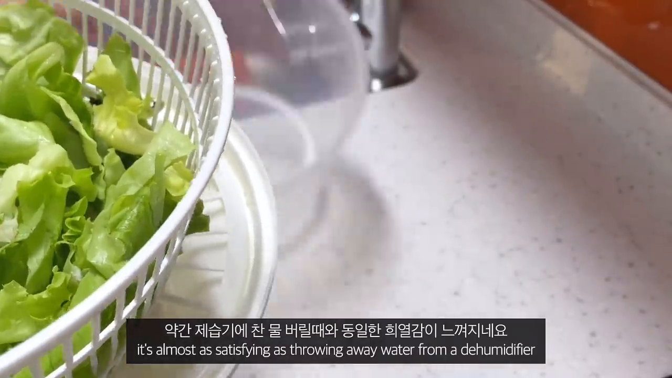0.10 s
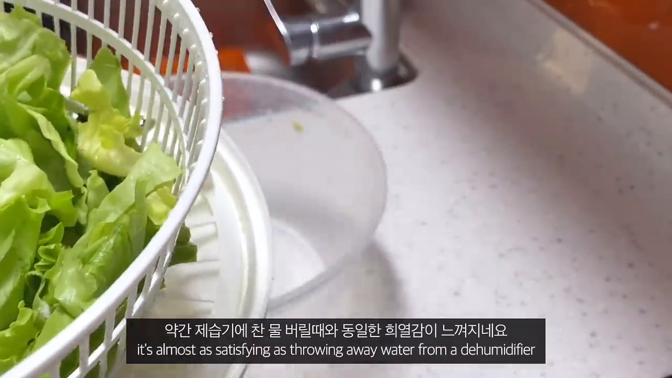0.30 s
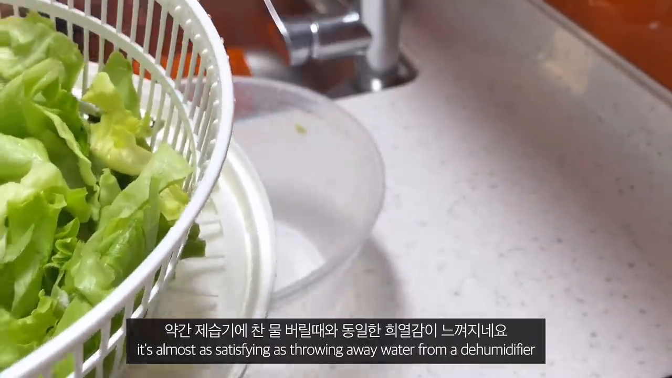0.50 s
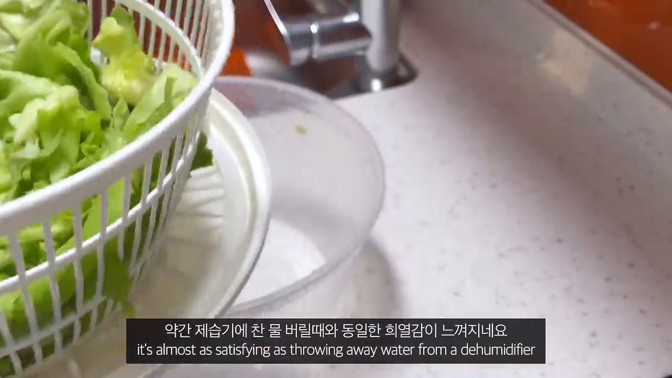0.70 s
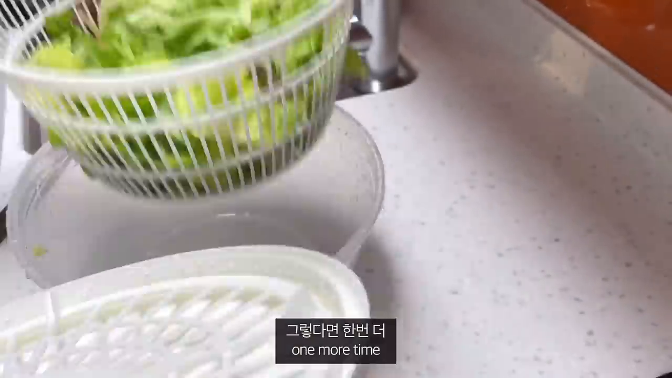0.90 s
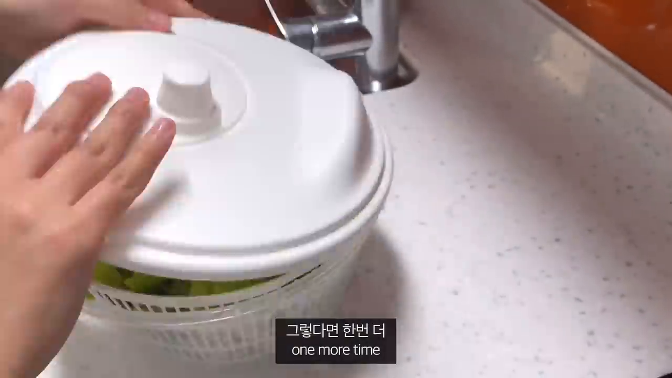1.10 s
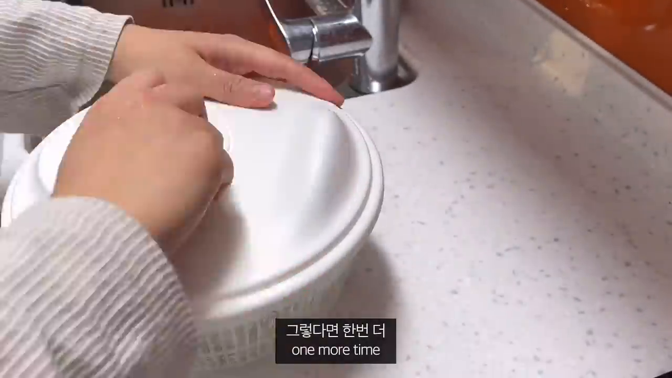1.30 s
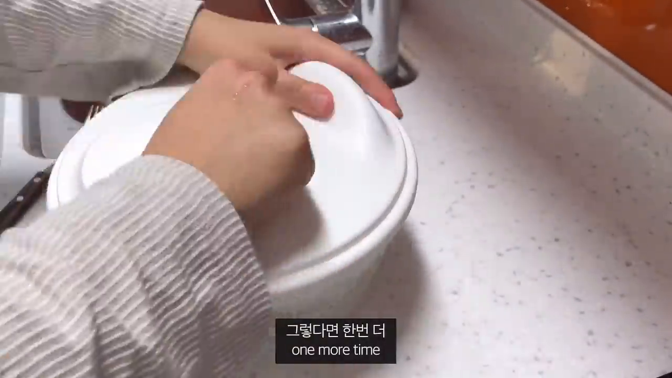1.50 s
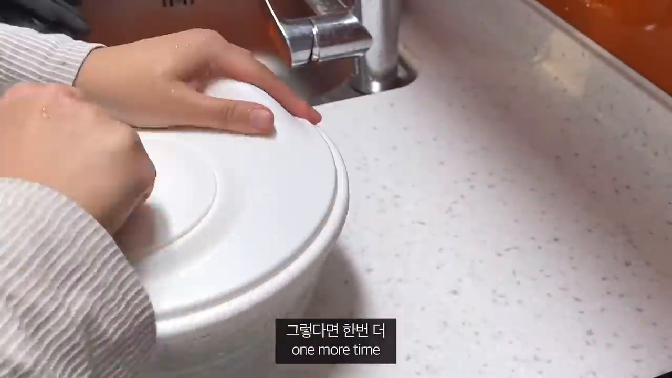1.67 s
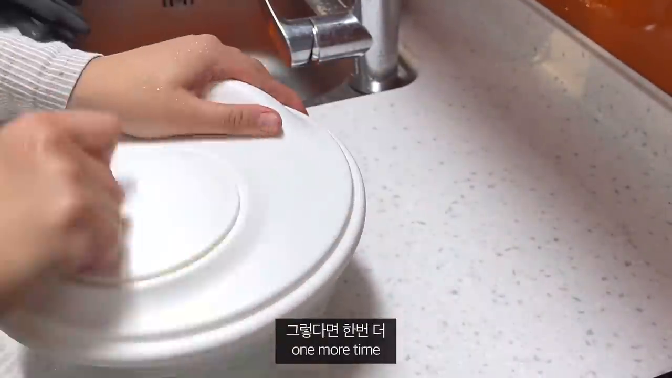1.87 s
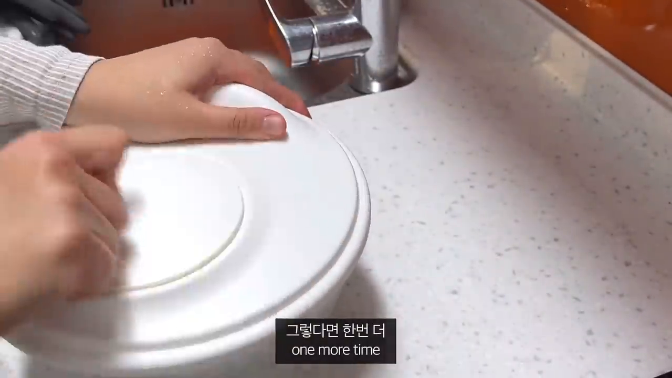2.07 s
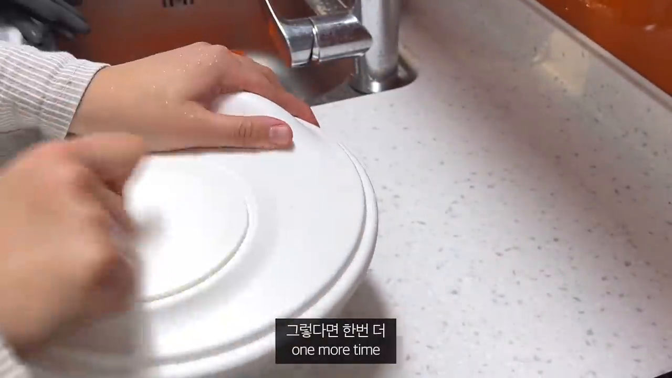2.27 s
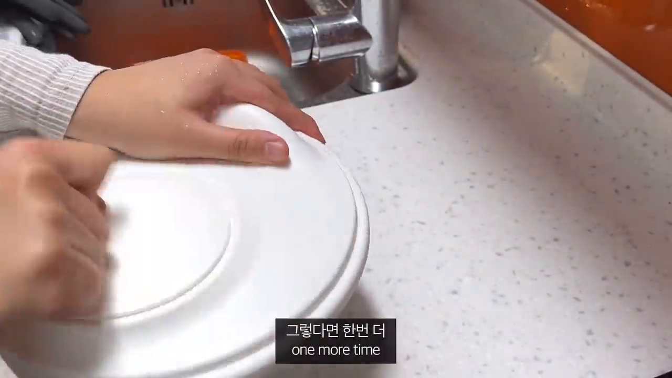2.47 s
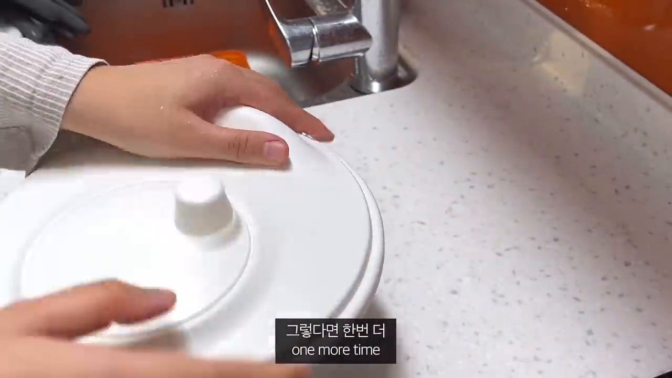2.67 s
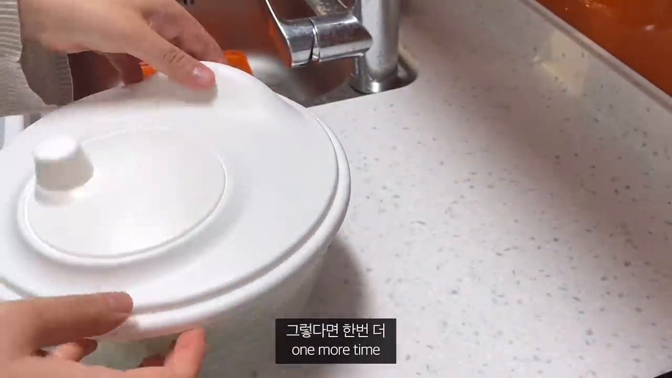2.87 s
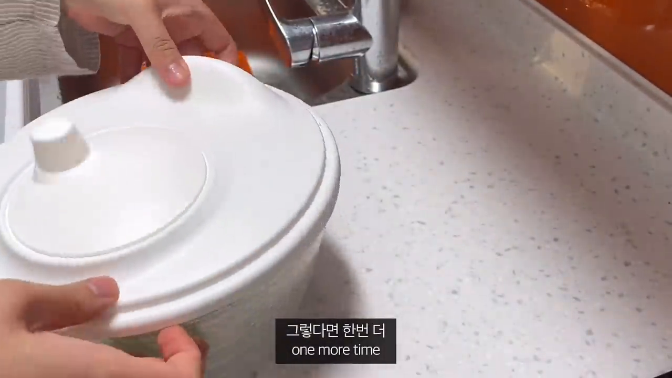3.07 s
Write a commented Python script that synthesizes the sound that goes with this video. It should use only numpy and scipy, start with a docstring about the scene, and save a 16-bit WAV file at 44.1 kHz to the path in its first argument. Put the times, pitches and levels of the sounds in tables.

```python
"""A steel sink, then a humming kitchen: a plastic tub knocks on the sink, which rumbles and drips.
After an abrupt change, a basket of lettuce clatters into a salad spinner and the lid is pressed on.
The crank is turned: the basket rubs and chatters once a revolution, then coasts with a light rattle.
Knocks are fading sine tones plus bursts of noise; rubbing, whir and rumble are shaped noise;
a train of uneven pulses drives the chatter, and a few steady tones make the fan's hum."""
import sys
import numpy as np
from scipy import signal
from scipy.fft import rfft, irfft, next_fast_len
from scipy.io import wavfile
from scipy.ndimage import uniform_filter1d, map_coordinates

SR = 44100
rng = np.random.default_rng(int(sys.argv[2]) if len(sys.argv) > 2 else 0)


def unload_audio(sound):
    """Save the sound as a 16-bit wav file, at the path given as the first command line argument."""
    columns = np.transpose(np.atleast_2d(sound))
    # keep every value between -1 and 1, then stretch to whole-number steps
    steps = np.round(np.clip(columns, -1, 1) * 32767)
    wavfile.write(sys.argv[1], SR, steps.astype(np.int16))


N = 138915  # length in samples

# T60 is the time in seconds in which a sound fades by 60 dB.
CHANGE_S = .787  # the sink gives way to the humming kitchen

# One rub of the basket per revolution. Each row: start in seconds, length in seconds, level in dB.
BASKET_RUBS = [(1.717, 0.054, -30), (1.812, 0.04, -25.5), (1.889, 0.029, -24.5), (1.962, 0.028, -24.5),
               (2.021, 0.042, -23.5), (2.093, 0.025, -24.5), (2.16, 0.027, -24.5), (2.227, 0.032, -23.5),
               (2.285, 0.044, -25), (2.361, 0.019, -22), (2.428, 0.029, -23.5), (2.491, 0.036, -24),
               (2.575, 0.031, -27.5)]
# Tone colour of the rubbing. Each row: frequency in Hz, relative level in dB.
RUB_COLOUR = [(200, -5), (500, 0), (1050, -4.5), (3300, 3), (4500, -2.5), (6000, -1), (15500, -20.5)]
# Chatter grows with speed. Each row: time in seconds, rate in Hz, level over the scraping in dB.
CHATTER_GROWTH = [(1.702, 621.5, -4.5), (2.03, 683.1, 3)]
# Bowl driven by the chatter. Each row: frequency in Hz, width in Hz, relative level in dB.
BOWL_RESONANCES = [(683, 68, -1), (1433, 73, -7), (2050, 98, -5.5), (3220, 110, -5.5), (3685, 59, -3.5),
                   (4310, 26, -6.5), (5350, 630, -15)]
RUB_ATTACK_S, RUB_T60 = 0.0056, 0.065
CHATTER_SAG_PER_S = 1.1  # share of the chatter rate lost per second
RUB_DETUNE = 0.033  # the bowl flexes: its resonances shift by about this share from rub to rub
# A resonance that falls through each rub.
SQUEAK_FROM_HZ, SQUEAK_TO_HZ, SQUEAK_DB = 3700, 2990, -11.5

# Steady whir of the basket in the bowl. Each row: time in seconds, level in dB.
WHIR_LEVEL = [(1.45, -54.5), (1.75, -31), (2.65, -29), (3.15, -40)]
# Tone colour of the whir. Each row: frequency in Hz, relative level in dB.
WHIR_COLOUR = [(200, -7), (690, 8.5), (1000, -2.5), (1600, -1.5), (2400, -6), (15500, -24)]
FLUTTER_PER_S, FLUTTER_DB = 36, 2.1  # knots of the random curve per second, its typical swing

# Plastic parts touching. Each row: start in seconds, crack level in dB, thud level in dB.
PLASTIC_CLICKS = [(0.665, -38.5, -41.5), (.950, -21, -58), (0.9838, -14.5, -28), (1.052, -24, -36),
                  (1.0763, -7.5, -31), (1.0927, -17, -27), (1.1205, -13, -19), (1.129, -21, -26),
                  (1.1672, -21.5, -23), (1.192, -12.5, -23), (1.1961, -10.5, -15), (1.2633, -18, -18),
                  (1.307, -29.5, -30.5), (1.3508, -12.5, -16.5), (1.529, -27.5, -27), (1.5985, -26.5, -29),
                  (1.636, -55, -26), (2.095, -22, -16), (2.577, -19.5, -15), (2.859, -22, -24.5)]
# Tone colour of a crack. Each row: frequency in Hz, relative level in dB.
CRACK_COLOUR = [(200, -34), (1700, 9.5), (2400, 2), (3200, 9.5), (4500, 1.5), (7500, -3), (16000, -13.5)]
CRACK_T60, CRACK_TAIL_DB, CRACK_TAIL_T60 = 0.017, -18, 0.084
# Tones of bowl and lid. Each row: frequency in Hz, relative level in dB, T60 in seconds.
BOWL_MODES = [(244, -5.5, 0.079), (412, -5, 0.07), (519.3, 4, 0.047), (660, 4.5, 0.022),
              (1068, -5.5, 0.031), (1547, -3, 0.043)]
SEAT_S, SEAT_DB = 1.3505, 1.5  # the lid seats
# Tones of the lid's dome. Each row: frequency in Hz, relative level in dB, T60 in seconds.
LID_MODES = [(228, -20, .09), (314, -15.5, .14), (672, -2.5, .036), (1080, -10, .016), (1600, -6, .012),
             (2020, -5, .013)]
RISE_CYCLES = 1  # time constant, in cycles, of a plastic tone's build-up
# The lid sliding on the rim. Each row: time in seconds, level in dB.
SCRAPE_LEVEL = [(1.07, -78), (1.082, -28), (1.132, -21), (1.15, -47), (1.21, -21.5), (1.25, -106)]
# Tone colour of the sliding. Each row: frequency in Hz, relative level in dB.
SCRAPE_COLOUR = [(200, -8.5), (500, 0), (1700, -6), (15000, -19)]
# The lid's resonance as it slides home. Each row: time in seconds, frequency in Hz.
SLIDE_PITCH = [(1.078, 1955), (1.134, 1462), (1.199, 1023)]

# Loose plastic parts ticking. Each row: time in seconds, level in dB.
RATTLE_LEVEL = [(.8, -57.5), (2.0, -41), (3.15, -54.5)]
RATTLE_PER_S, RATTLE_SCATTER_DB = 130, 4.5

# Rumble of the sink. Each row: time in seconds, level in dB.
SINK_LEVEL = [(0, -48), (.23, -42.5), (.28, -36.5), (.5, -41.5)]
# Tone colour of the rumble. Each row: frequency in Hz, relative level in dB.
SINK_RUMBLE = [(30, -24), (52, -6), (122, -6), (153, 6), (190, -14.5), (1000, -30.5), (3000, -41),
               (14000, -54)]
# Blows on the sink. Each row: start in seconds, ring level in dB, level of the noise splash in dB.
SINK_BLOWS = [(0.2426, -11, -11), (.263, -18, -22.5), (.358, -33, -30)]
# Tones of sink and tub. Each row: frequency in Hz, relative level in dB, T60 in seconds.
SINK_MODES = [(157.7, -0.5, 0.38), (701, 11, 0.037), (1298, 1.5, 0.035), (2340, -12.5, 0.056)]
# Tone colour of the splash of noise. Each row: frequency in Hz, relative level in dB.
SINK_NOISE = [(80, 9.5), (400, 5), (1300, -3), (2300, -10), (3200, -22.5), (6500, -31.5), (9000, -44.5)]
# Drips. Each row: start in seconds, frequency in Hz, starting level in dB.
DRIPS = [(.449, 3010, -53)]

# A fan's tones. Each row: frequency in Hz, average level in dB.
FAN_TONES = [(528, -47.5), (660, -45.5), (699, -53.5)]
FAN_AIR_DB = -48
# Tone colour of the fan's air. Each row: frequency in Hz, relative level in dB.
FAN_AIR = [(200, -1.5), (700, 0.5), (950, -19), (15000, -33)]

# Left-right balance of the spinner. Each row: frequency in Hz, left minus right in dB.
BALANCE = [(850, -1.5), (1800, 9.5), (3500, -1), (14000, 4)]
# Scattered reflections, before a further cut. Each row: frequency in Hz, relative side level in dB.
SPREAD = [(150, -24), (310, -19), (600, -13), (1700, -2.5), (8000, 0.5)]
ROOM_DB, ROOM_T60 = -17.5, 0.16
LOW_CUT_HZ, TOP_HZ = 205, 16100


def rubs():
    """Once a revolution the basket scrapes the bowl; its chatter, at a sagging rate, rings the bowl."""
    out, t = np.zeros(N), np.arange(SR // 6) / SR
    scraping = patchy(grit(RUB_COLOUR, grain_db=4, rate=900), depth_db=4.5)
    when, rates, strengths = np.transpose(CHATTER_GROWTH)
    for s, length, db in BASKET_RUBS:
        hz = np.interp(s, when, rates)
        chatter_db = np.interp(s, when, strengths)
        fade_db = -60 * np.maximum(t - length, 0) / RUB_T60
        press = np.clip(t / RUB_ATTACK_S, 0, 1) * amp(db + fade_db)

        # uneven pulses, one per chatter cycle
        sag = CHATTER_SAG_PER_S * (np.minimum(t, length) - length / 2)
        cycles = np.cumsum(hz * (1 - sag)) / SR
        size = rng.standard_normal(160)
        number = np.arange(len(size))
        times = np.interp(number, cycles, t)
        strength = amp(2 * size) * (number < cycles[-1])
        pulses = np.histogram(times, len(t), (0, t[-1]), weights=strength)[0]
        friction = unit(pulses) + amp(1.5) * rng.standard_normal(len(t))

        shift = 1 + RUB_DETUNE * rng.uniform(-1.1, 1)
        resonances = np.multiply(BOWL_RESONANCES, [shift, 1, 1])
        bowl = as_loud_as(resonate(press * friction, resonances), press)
        rim = squeak(np.interp(t, [0, length], [SQUEAK_FROM_HZ, SQUEAK_TO_HZ]), width_hz=130)
        rubbing = scraping[round(s * SR):][:len(t)] + amp(SQUEAK_DB) * rim
        add(out, s, press * rubbing + amp(chatter_db) * bowl)
    return out


def whir():
    """The basket and its gears run on: gritty noise with an uneven flutter."""
    flutter = amp(FLUTTER_DB * wobble(FLUTTER_PER_S))
    turning = patchy(grit(WHIR_COLOUR, grain_db=3.5, rate=400), depth_db=2)
    return level(WHIR_LEVEL) * flutter * turning * (clock() > WHIR_LEVEL[0][0])


def plastic():
    """Basket and lid click against the bowl; the lid slides over the rim and seats with a ring."""
    pitch = np.interp(clock(), *np.transpose(SLIDE_PITCH))
    slide = grit(SCRAPE_COLOUR, grain_db=7, rate=600) + amp(-1.5) * squeak(pitch, width_hz=140)
    out = level(SCRAPE_LEVEL) * slide * (clock() > SCRAPE_LEVEL[0][0])

    t = np.arange(SR // 4) / SR
    fall = amp(-60 * t / CRACK_T60) + amp(CRACK_TAIL_DB - 60 * t / CRACK_TAIL_T60)
    fall = fall * (1 - np.exp(-t / 0.00059))  # quick but not instant start
    for s, crack_db, thud_db in PLASTIC_CLICKS:
        crack = as_loud_as(fall * patchy(noise(CRACK_COLOUR, size=len(t)), depth_db=4), fall)
        thud = ring(BOWL_MODES, t, detune=0.044, rise=RISE_CYCLES)
        add(out, s, amp(crack_db) * crack + amp(thud_db) * thud)
    add(out, SEAT_S, amp(SEAT_DB) * ring(LID_MODES, t, detune=0, rise=RISE_CYCLES))
    return out


def rattle():
    """Loose plastic parts tick at random: each hit starts a quickly fading burst of noise."""
    scatter = amp(RATTLE_SCATTER_DB * np.clip(rng.standard_normal(N), -2, 2))
    hits = (rng.random(N) < RATTLE_PER_S / SR) * scatter
    ticks = signal.lfilter([1], [1, -amp(-60 / (CRACK_T60 * SR))], hits)
    return level(RATTLE_LEVEL) * patchy(ticks * noise(CRACK_COLOUR), depth_db=5)


def sink():
    """The basin rumbles, booms under the tub's blows and catches a drip, a fading band of noise."""
    out, t = level(SINK_LEVEL) * noise(SINK_RUMBLE), np.arange(SR // 2) / SR
    fall = amp(-60 * t / 0.039) + amp(-8 - 60 * t / 0.26)  # a short splash and a longer tail
    fall = fall * (1 - np.exp(-t / 0.00058))
    for s, ring_db, noise_db in SINK_BLOWS:
        burst = noise(SINK_NOISE, size=len(t)) * fall
        boom = ring(SINK_MODES, t, detune=0, rise=1.6)
        add(out, s, amp(ring_db) * boom + amp(noise_db) * burst)
    for s, hz, db in DRIPS:
        hiss = rng.standard_normal(len(t))
        plink = unit(filtered(hiss, lambda f: 1 / (1 + ((f - hz) / 170) ** 2)))
        add(out, s, amp(db - 60 * t / 0.22) * plink)
    return out


def fan():
    """A fan hums with tones unsteady in level and phase, over a bed of air noise."""
    out = amp(FAN_AIR_DB) * noise(FAN_AIR)
    for hz, db in FAN_TONES:
        phase = 2 * np.pi * hz * clock() + .4 * wobble(14)
        out += amp(db + 1.2 * wobble(9)) * np.sqrt(2) * np.sin(phase)
    return out


def kitchen(x):
    """Counter and tiles scatter the sound between the ears; a short room tail follows."""
    # random phases blur the sound; the blur then follows the loudness of the original
    z = signal.stft(x, nperseg=256)[2]
    scattered = signal.istft(z * np.exp(2j * np.pi * rng.random(z.shape)), nperseg=256)[1][:N]
    power = lambda v: np.abs(uniform_filter1d(v ** 2, size=96)) + 1e-14
    scattered = scattered * np.sqrt(power(x) / power(scattered))
    side = filtered(scattered, lambda hz: amp(along(SPREAD, hz) - 3))

    tail = rng.standard_normal((2, SR // 2)) * amp(-60 * clock()[:SR // 2] / ROOM_T60)
    tail = tail / np.linalg.norm(tail[0])
    delayed = np.pad(x, (300, 0))[None]  # the tail starts 300 samples late
    wet = signal.fftconvolve(delayed, tail, axes=1)[:, :N]
    return np.array([x + side, x - side]) + amp(ROOM_DB) * wet


def ring(modes, t, detune, rise):
    """A struck object sounds fading tones that build up over rise cycles, with random detuning."""
    out = 0
    for (hz, db, t60), bend in zip(modes, rng.standard_normal(len(modes))):
        envelope = amp(db - 60 * t / t60) * (1 - np.exp(-t * hz / rise))
        out = out + envelope * np.sin(2 * np.pi * hz * (1 + detune * bend) * t)
    return out


def grit(colour, grain_db, rate):
    """Friction noise that comes in short grains, rms 1."""
    grains = rng.standard_normal(N) * amp(grain_db * np.clip(wobble(rate), -2, 2))
    return unit(filtered(grains, lambda hz: amp(along(colour, hz))))


def patchy(x, depth_db):
    """Resonances come and go as the point of contact moves; the result has rms 1."""
    z = signal.stft(x, nperseg=512)[2]
    field = uniform_filter1d(rng.standard_normal(z.shape), size=3, axis=0)  # over frequency
    field = uniform_filter1d(field, size=4, axis=1)  # over time
    gain = amp(depth_db * np.clip(unit(field), -2, 2))
    return unit(signal.istft(z * gain, nperseg=512)[1][:len(x)])


def squeak(hz, width_hz):
    """A narrow rubbed resonance that follows a pitch curve, rms 1."""
    drift = filtered(rng.standard_normal((2, len(hz))), lambda f: 1 / (1 + (f / width_hz) ** 2))
    phase = 2 * np.pi * np.cumsum(hz) / SR
    return unit(drift[0] * np.sin(phase) + drift[1] * np.cos(phase))


def resonate(x, resonances):
    """Play x through fixed resonances, each boosting a band around its centre."""
    def response(f):
        total = 0
        for k, (centre, width, db) in enumerate(resonances):
            damping = 1j * f * width
            band = damping / (centre * centre - f * f + damping)
            total = total + (-1) ** k * amp(db) * band  # neighbours have opposite signs
        return total
    return filtered(x, response)


def noise(colour, size=N):
    """Coloured noise of rms 1."""
    return unit(filtered(rng.standard_normal(size), lambda hz: amp(along(colour, hz))))


def filtered(x, response):
    """Multiply the spectrum of x by a response that depends on frequency."""
    n = x.shape[-1]
    m = next_fast_len(n + 4096)
    return irfft(rfft(x, m) * response(np.fft.rfftfreq(m, 1 / SR)), m)[..., :n]


def wobble(rate):
    """A smooth random curve with rate knots a second."""
    return map_coordinates(rng.standard_normal(4096), [clock() * rate], mode="wrap")


def level(rows):
    """Gain per sample from rows of seconds and dB."""
    return amp(np.interp(clock(), *np.transpose(rows)))


def along(points, hz):
    """Read a curve of frequency and value on a logarithmic frequency axis."""
    f, v = np.transpose(points)
    return np.interp(np.log(hz + 1), np.log(f + 1), v)


def as_loud_as(x, envelope):
    """Scale x to the energy of an envelope."""
    return unit(x) * np.sqrt(np.mean(envelope ** 2))


def unit(x):
    """Scale x to rms 1."""
    return x / np.sqrt(np.mean(x ** 2) + 1e-20)


def amp(db):
    """Turn dB into a gain."""
    return 10 ** (np.asarray(db) / 20)


def clock():
    """Time of every sample in seconds."""
    return np.arange(N) / SR


def add(track, s, sound):
    """Mix a sound into the track at s seconds."""
    part = track[round(s * SR):][:len(sound)]
    part += sound[:len(part)]


def scene():
    """The sink first, then the spinner with its deep bass cut away."""
    after = np.clip((clock() - CHANGE_S) / 0.0048, 0, 1)  # a 4.8 ms crossfade
    spinner = kitchen(plastic() + rubs() + whir() + after * (rattle() + fan()))
    # half of the left-right difference goes to each side
    spinner = filtered(spinner, lambda hz: amp(np.outer([.5, -.5], along(BALANCE, hz))))
    low_cut = signal.butter(3, LOW_CUT_HZ, "high", fs=SR, output="sos")
    spinner = signal.sosfilt(low_cut, spinner)

    # the sink leans right in the bass, with a delayed copy spread to the sides
    lean = lambda hz: amp(np.outer([.5, -.5], -3 / (1 + (hz / 400) ** 2)))
    basin = filtered((1 - after) * sink(), lean)
    side = filtered(np.pad(basin[0], (90, 0))[:N], lambda hz: amp(along(SPREAD, hz) - 4))
    return spinner + basin + np.array([side, -side])


def record(dry):
    """Round off the highest peaks, then cut steeply above the top frequency."""
    rounded = dry / (1 + np.abs(dry / .95) ** 6) ** (1 / 6)
    return filtered(rounded, lambda hz: 1 / np.sqrt(1 + (hz / TOP_HZ) ** 160))


dry = scene()
out = record(dry)
unload_audio(out)
```